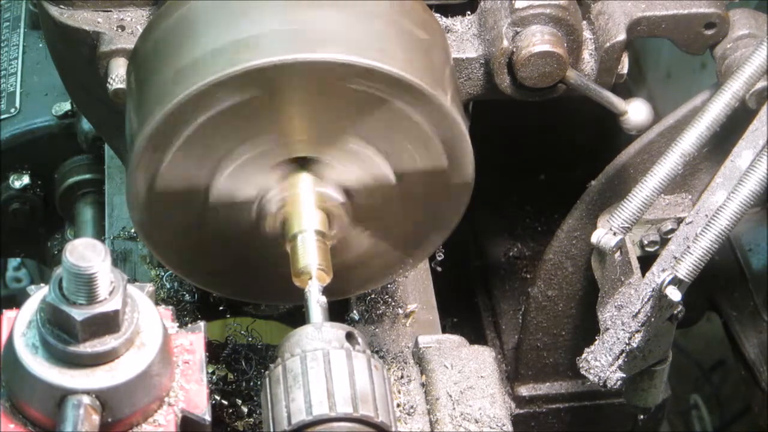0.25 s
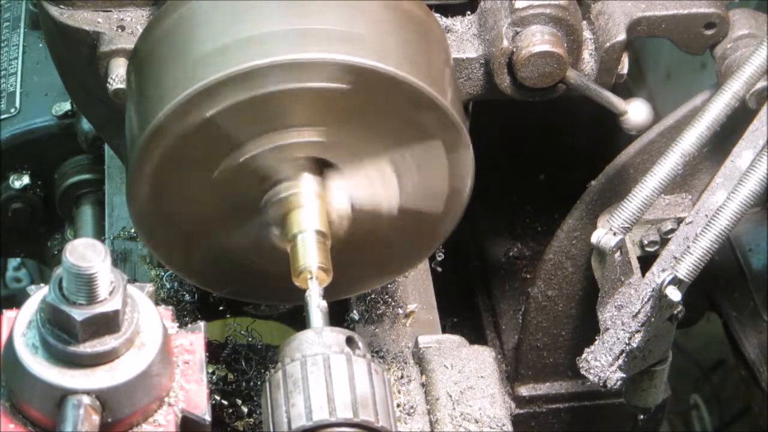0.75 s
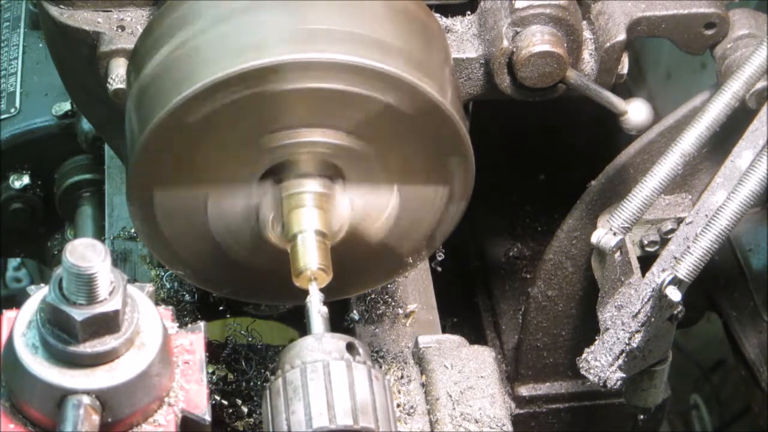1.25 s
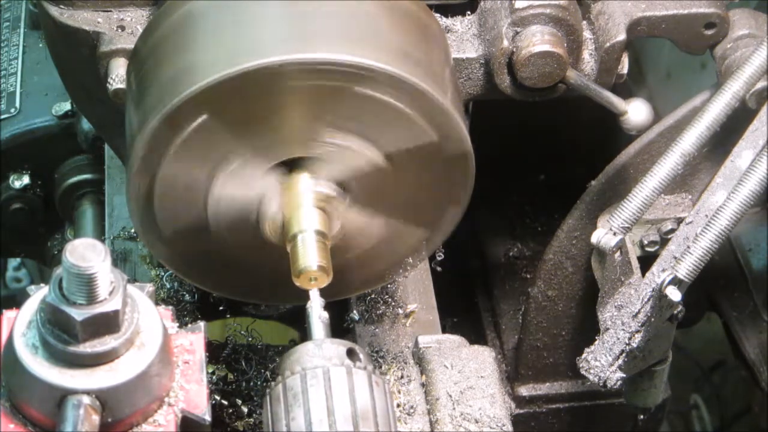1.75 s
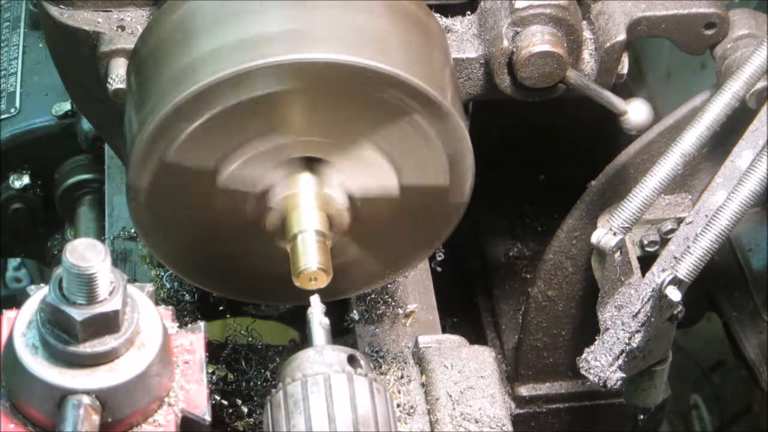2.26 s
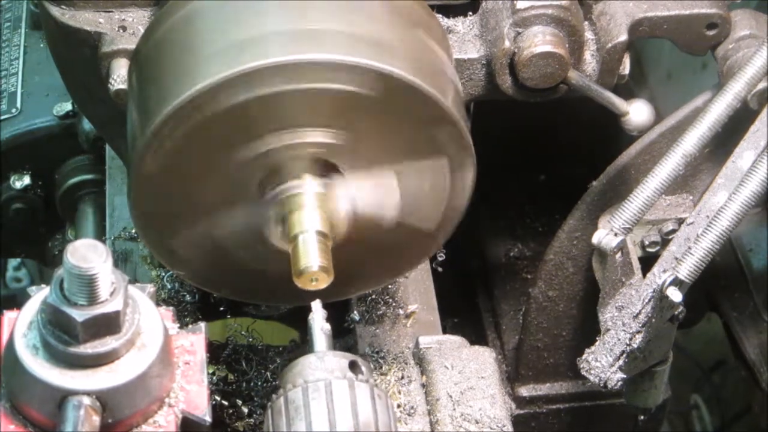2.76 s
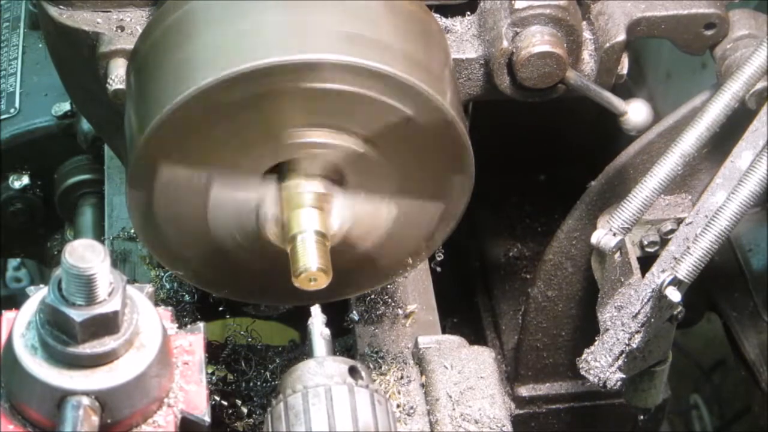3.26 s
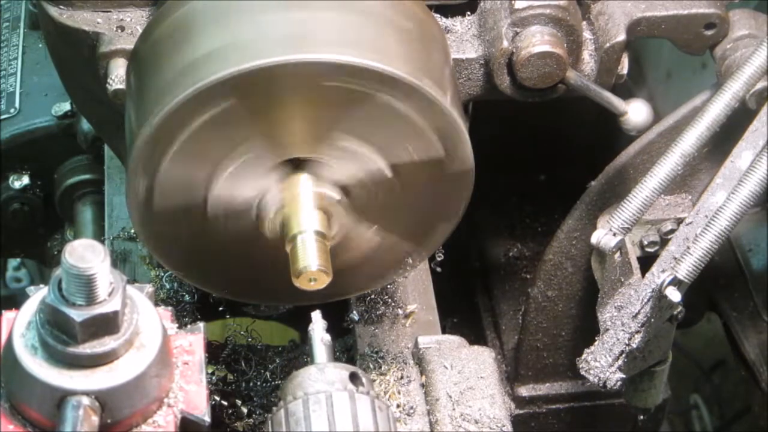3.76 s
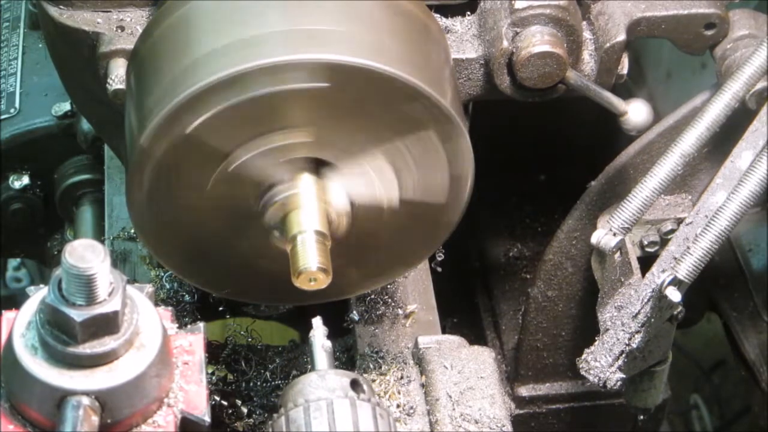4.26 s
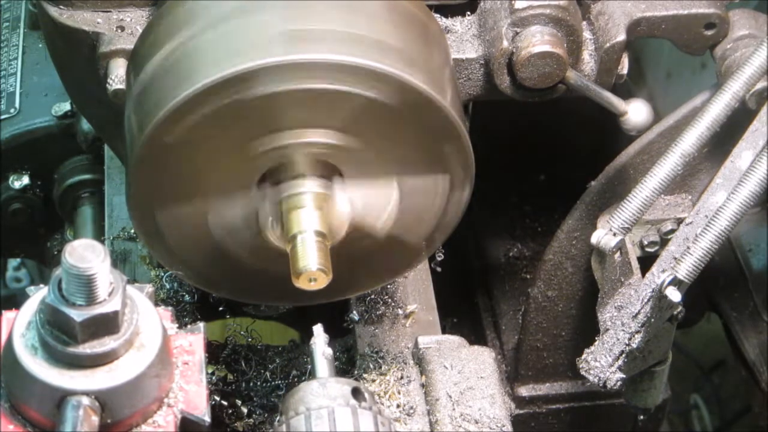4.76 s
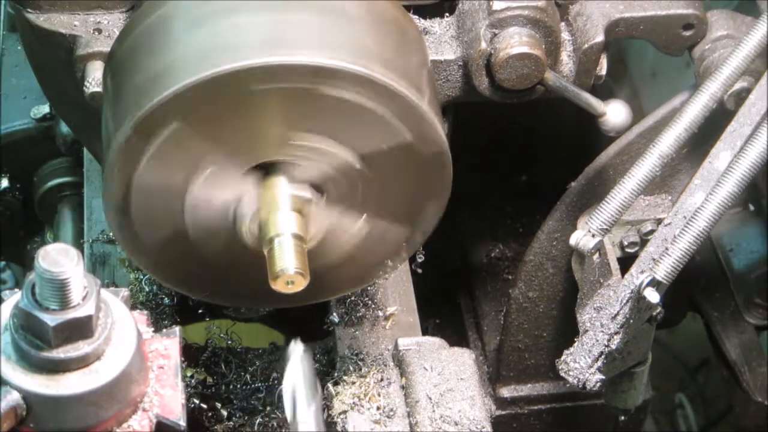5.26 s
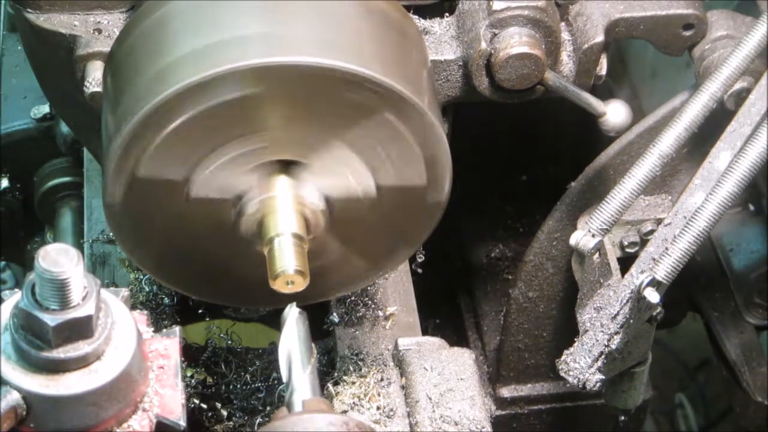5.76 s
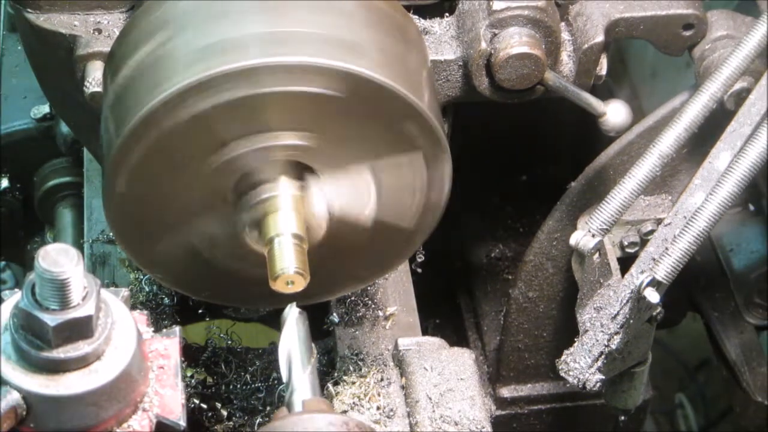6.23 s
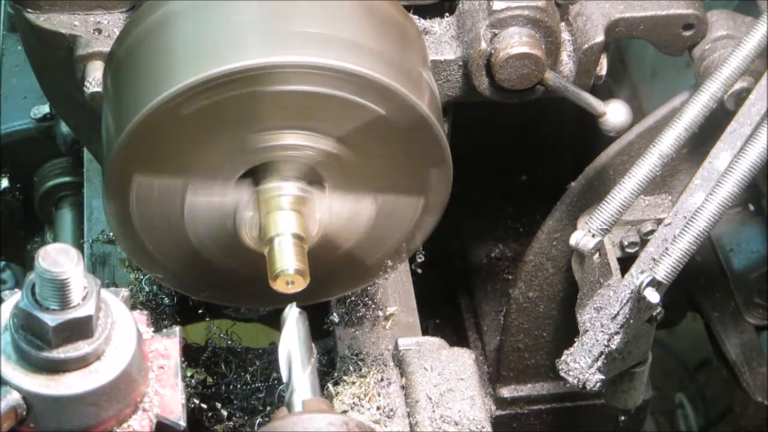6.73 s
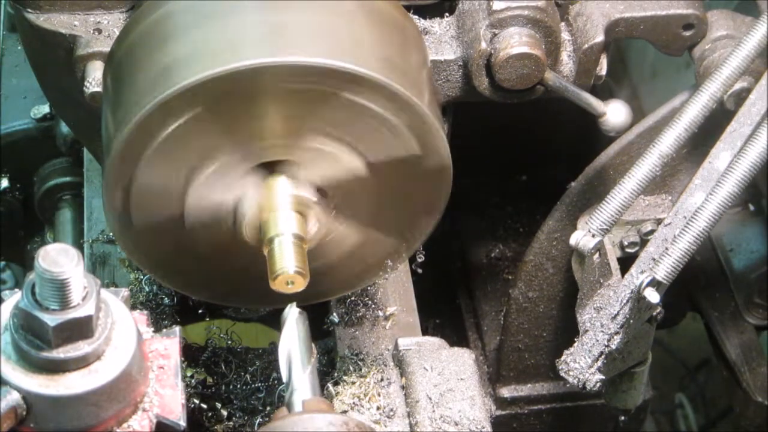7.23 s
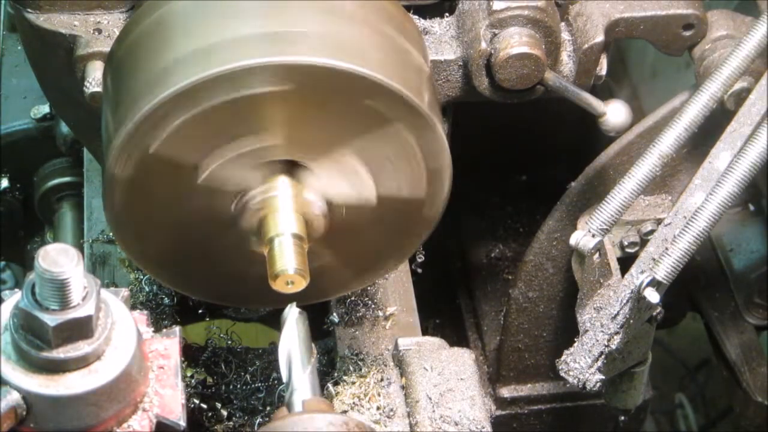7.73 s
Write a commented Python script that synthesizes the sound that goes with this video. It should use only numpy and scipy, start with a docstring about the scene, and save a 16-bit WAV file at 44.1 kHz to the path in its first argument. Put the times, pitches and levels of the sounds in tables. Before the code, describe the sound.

Close in a workshop, a belt-driven lathe runs steadily: low rumble and hum, gritty gear whir, a thin squeaky chirr and airy bearing hiss. Light metallic ticks fall about twice a second. The machine eases slightly as a small drill leaves brass, with dull soft thumps. All fades to silence near five seconds, then the same whir fades in, without ticks, and a low groan starts at the very end.

```python
"""Drilling brass on a belt-driven lathe

Modulated noise rings filters shaped like the castings, bearings and a loose pulley; drifting sines hum and whine.
A small drill leaves the brass, the belt joint ticks once a lap and the tailstock thumps the bed as decaying modes.
The sound fades to silence, then fades in on a second set-up without ticks, where a larger drill begins to rub."""
import sys
import numpy as np
from scipy import signal
from scipy.fft import rfft, irfft, next_fast_len
from scipy.io import wavfile
from scipy.ndimage import map_coordinates

SR = 44100
rng = np.random.default_rng(int(sys.argv[2]) if len(sys.argv) > 2 else 0)


def put_to_file(sound):
    """Save the sound as 16-bit audio at rate SR, in the file named by the first command-line argument."""
    columns = np.atleast_2d(sound).T  # one column per channel
    safe = np.clip(columns, -1, 1)
    whole_steps = np.round(safe * 32767)
    wavfile.write(sys.argv[1], SR, whole_steps.astype(np.int16))


N = 352359

# All layer levels below are those ahead of the fader in record().
CHANGE_S = 5.16  # the second set-up starts here, in silence
SPINDLE_HZ, SHAFT_HZ = 6.65, 13.71  # turns per second
VEE_BELT_HZ, FLAT_BELT_HZ = 5.14, 2.195  # laps per second
TOP_HZ = 15780  # band limit

# reference levels (first set-up dB, second set-up dB), which each source trims
RUMBLE_DB, GEAR_DB, HISS_DB = (-35.5, -36), (-35, -36.5), (-38.4, -38.5)
# the machine eases off once, as the small drill leaves the cut
EASE_START_S, EASE_FALL_S, EASE_HOLD_S, EASE_RECOVER_S = 1.81, 0.86, 0.54, 0.66
EASE_RUMBLE_DB, EASE_GEAR_DB, EASE_HISS_DB = 2.5, 2, 2
# slow swell of gears and pulley (peak dB), and scale of the chance drift of the rumble
SWELL_HZ, SWELL_CREST_S, SWELL_DB, DRIFT_DB = 2.11, 0.072, 0.54, 0.6
# straight fades: silent from, silent until, then gain per second
FADE_OUT_END_S, FADE_IN_START_S, FADE_IN_PER_S = 5.135, 5.203, 0.196
# first edge of the belt lacing to the second, then on to the rebound
EDGE_GAP_S, REBOUND_S = 0.0035, 0.0046
# the large drill meets the brass: time of full contact, level there, and rise on the way
BITE_S, BITE_DB, BITE_RISE_DB_PER_S = 7.87, -36.5, 135


def amp(db):
    """Level to amplitude: 20 dB is a factor of ten in pressure."""
    return 10 ** (np.asarray(db) / 20)


def unit(x):
    """Normalise by mean power, so that the rms is 1."""
    return x / np.sqrt(np.mean(x ** 2) + 1e-20)


def clock():
    """Sampling: the time of each sample, in s."""
    return np.arange(N) / SR


def set_up(first, second):
    """Piecewise control: one value for the first set-up, another for the second."""
    return np.where(clock() < CHANGE_S, first, second)


def wobble(rate):
    """Band-limited fluctuation: a smooth curve through random knots, rate of them per second."""
    knots = rng.standard_normal(int(N * rate / SR) + 4)
    return map_coordinates(knots, [clock() * rate])


def turning(hz, crest_s=0):
    """Periodic modulation: a cosine swing of hz cycles per second with a crest at crest_s."""
    return np.cos(2 * np.pi * hz * (clock() - crest_s))


def body(spectrum, resonances=(), size=8192):
    """Minimum phase: the causal impulse response of a broad spectrum with resonances or dips."""
    hz = np.fft.rfftfreq(size, 1 / SR)
    f, level = np.transpose(spectrum)
    db = np.interp(np.log(hz + 1), np.log(f), level)
    for centre, width, height in resonances:
        db = db + height / (1 + (2 * (hz - centre) / width) ** 2)
    # folding the cepstrum onto positive times makes the response causal
    cepstrum = irfft(np.log(amp(db)))
    cepstrum[1:size // 2] *= 2
    cepstrum[size // 2 + 1:] = 0
    return irfft(np.exp(rfft(cepstrum)))


def rub(response, force_db):
    """Random excitation: noise of changing force stands for countless contacts ringing a body; rms 1."""
    force = rng.standard_normal(N) * amp(force_db)
    return unit(signal.fftconvolve(force, response)[:N])


def add(track, s, sound):
    """Superposition: mix a sound into the track at time s."""
    start = round(s * SR)
    track[start:start + len(sound)] += sound[:N - start]


def tone(hz, stray_hz, stray_rate, flutter_db):
    """Frequency and amplitude modulation: a sine of rms 1 that strays in pitch and level."""
    pitch_hz = hz + stray_hz * wobble(stray_rate)
    phase = 2 * np.pi * (np.cumsum(pitch_hz) / SR + rng.random())
    return unit(np.sin(phase) * amp(flutter_db * wobble(6.7)))


def motor():
    """Tonal radiation: the motor and drive hum on narrow lines, with a thin whine on top."""
    # motor and drive tones: f/Hz, first set-up level/dB, second set-up level/dB
    hum_lines = [(73.3, -49, -52.5), (120, -46.5, -42), (183, -52, -57), (221, -49, -49),
                 (244, -49.5, -48.5), (295, -51, -53), (498, -55, -53.5), (571, -53, -53), (610, -60, -50),
                 (658, -60, -50.5)]
    # thin whine: f/Hz, level/dB
    whine_lines = [(10121, -74), (10343, -63), (10392, -67), (10494, -61), (10939, -77)]
    hum = sum(amp(set_up(db1, db2)) * tone(hz, stray_hz=0.01 * hz, stray_rate=14, flutter_db=1.5)
              for hz, db1, db2 in hum_lines)
    whine = sum(amp(db) * tone(hz, stray_hz=4, stray_rate=56, flutter_db=2.0)
                for hz, db in whine_lines)
    return hum + whine


def headstock(rumble_db, gear_db):
    """Forced vibration: gear teeth rattle the castings in step with the shaft and the motor belt's laps."""
    # spectra of the low rumble and of the gear noise: f/Hz, relative density level/dB per Hz
    rumble_spectrum = [(12, -24), (30, -17.5), (60, -8.5), (95, -6), (150, -3), (240, -1.5), (320, 1),
                       (400, -7.5), (530, -5.5), (600, -2), (700, -7.5), (800, -19), (1100, -51.5),
                       (2000, -100)]
    gear_spectrum = [(300, -76), (800, -10), (930, -1.5), (1250, -1.5), (1600, -2), (2000, -1.5),
                     (2450, -4.5), (3200, -3.5), (3700, -11.5), (6000, -63.5)]
    # casting resonances and dips in each set-up: f/Hz, width/Hz, height/dB
    first_castings = [(1003, 22, 8), (1083, 12, -14.5), (1223, 120, 4.5), (1474, 79, 5), (1752, 68, 8),
                      (1841, 94, 8), (2254, 26, 8.5), (2790, 13, 10), (2984, 70, 6)]
    second_castings = [(1040, 80, 1.5), (1090, 24, -18), (1264, 60, 4), (1477, 110, 5), (1780, 50, 3),
                       (1950, 67, 5), (3150, 200, -8)]
    belt_db = 1.1 * turning(VEE_BELT_HZ, crest_s=set_up(0.182, 5.541))
    teeth_db = 0.6 * turning(3 * SHAFT_HZ, crest_s=0.018) + 0.6 * turning(6 * SHAFT_HZ)
    force_db = belt_db + teeth_db + 1.3 * wobble(170) + 0.5 * wobble(30)
    first_gears = amp(1.02) * rub(body(gear_spectrum, first_castings), force_db)
    second_gears = amp(0.85) * rub(body(gear_spectrum, second_castings), 0.66 * force_db)
    gears = set_up(first_gears, second_gears)
    rumble = rub(body(rumble_spectrum), 0.66 * wobble(40))
    return amp(gear_db) * gears + amp(rumble_db - 0.96) * rumble


def pulley(gear_db, chirr_db=-12, rasp_db=-9):
    """Amplitude modulation: a loose pulley chirrs in step with its shaft, a wavering squeak over a rasp."""
    # pulley resonances: f/Hz, width/Hz, height/dB
    pulley_resonances = [(3019, 130, 20), (3097, 50, 13)]
    rattle_db = 2.2 * turning(3 * SHAFT_HZ, crest_s=0.018) + 2.4 * turning(6 * SHAFT_HZ)
    knock_db = 2.5 * (turning(SHAFT_HZ, crest_s=5.502) + turning(2 * SHAFT_HZ, crest_s=5.502))
    swing_db = set_up(rattle_db + 0.5 * knock_db, 0.5 * rattle_db + knock_db)
    force_db = swing_db + 0.81 * wobble(25)
    wavering = tone(set_up(3010, 3065), stray_hz=59.8, stray_rate=190, flutter_db=1.0)
    squeak = unit(amp(force_db) * wavering)
    rasp = rub(body([(1200, -49), (3000, 2), (7000, -55.5)], pulley_resonances), force_db)
    # louder as the gears work harder; the squeak is trimmed for each set-up
    squeak_db = chirr_db + set_up(-2.3, 4.1)
    return amp(gear_db) * (amp(squeak_db) * squeak + amp(rasp_db) * rasp)


def spindle(hiss_db):
    """Rolling noise: bearings hiss, swelling each turn and, at first, as the belt joint passes either pulley."""
    # hiss spectrum: f/Hz, relative density level/dB per Hz
    hiss_spectrum = [(1500, -44.5), (3000, -13), (3800, -1), (4400, 1), (5500, 2.5), (6400, 1.5),
                     (7100, -5), (8000, -11.5), (8700, -14.5), (9800, -19), (11400, -22), (12600, -29.5),
                     (15700, -35.5)]
    # bearing resonances and dips: f/Hz, width/Hz, height/dB
    bearing_resonances = [(4090, 70, 3), (5485, 110, 2), (5880, 100, -4), (6050, 90, 4), (7000, 50, 6),
                          (7590, 50, 6), (7740, 50, 4), (10400, 350, 6)]
    turn = turning(SPINDLE_HZ, crest_s=set_up(0.131, 5.562))
    pull = turning(2 * FLAT_BELT_HZ, crest_s=0.11)  # two pulleys in each lap
    lap = turning(FLAT_BELT_HZ, crest_s=0.27)
    swing_db = set_up(1.2 * turn + 0.5 * pull + 0.45 * lap, 1.4 * turn)
    force_db = swing_db + 0.5 * wobble(22) + 1.4 * wobble(250)
    return amp(hiss_db - 0.46) * rub(body(hiss_spectrum, bearing_resonances), force_db)


def belt_joint(scrape_t60=0.026, room_t60=0.4, room_db=-24):
    """Impact excitation: steel lacing slaps the pulley with one edge, the other, then a weak rebound."""
    # joint on the pulley, once a lap: t/s, relative level/dB, second edge re first/dB, brightness/dB
    laps = [(0.2405, -22, 2.5, -2.5), (0.6979, -17.5, -4.5, -5.5), (1.152, -19.5, -3, -3.5),
            (1.6075, -19.5, -6.5, -3), (2.0624, -15.5, -6, 1), (2.5164, -15.5, 1, -3),
            (2.9725, -15.5, 2, -4), (3.4292, -16.5, -1, -1), (3.8845, -18.5, 6, 2), (4.3409, -16, -2, -0.5),
            (4.7973, -22, 1, -4)]
    # scrape spectrum: f/Hz, relative density level/dB per Hz
    click_spectrum = [(200, -16), (800, -26), (1500, -2.5), (2500, -8), (3400, 1.5), (3850, -5.5),
                      (4400, 4.5), (6400, 1), (7600, -10), (9000, -7), (10200, -19), (13200, -17),
                      (15700, -39)]
    # modes that the joint rings: f/Hz, mean relative level/dB, t60/s
    steel_modes = [(2290, -13, 0.12), (2794, -15.5, 0.15), (3055, 2, 0.025), (3410, -6.5, 0.019),
                   (4330, 0.5, 0.028), (4520, -5, 0.043), (4670, 1.5, 0.028), (4770, -7.5, 0.12),
                   (5526, 0, 0.053), (5620, -8, .03), (6298, 4, 0.042), (6430, -3.5, 0.046),
                   (6700, -13, .05), (7380, -8, 0.063), (8900, -13.5, 0.053), (9730, -20.5, .045),
                   (10440, -22.5, 0.045), (12400, -16.5, 0.046), (13350, -22, .035)]
    track, t = np.zeros(N), np.arange(SR // 4) / SR
    click = body(click_spectrum)
    scrape_db = -1.5  # relative to the ring
    attack = 1 - np.exp(-t / 0.0002)
    # one contact's scrape, with the faint short tail of the workshop
    force = amp(-60 * t / scrape_t60) + amp(room_db - 60 * t / room_t60)
    for s, db, second_db, bright_db in laps:
        # brightness tilts the sound toward the treble, as a harder blow does
        hardness = body([(3000, -bright_db), (6000, 0), (12000, bright_db)], size=512)
        contacts = [(0, 0), (EDGE_GAP_S, second_db), (EDGE_GAP_S + REBOUND_S, -14)]
        # the contacts share one energy
        total = np.sqrt(sum(amp(level) ** 2 for delay, level in contacts))
        for delay, level in contacts:
            ring = sum(amp(mode_db + rng.normal(0, 1.0) - 60 * t / t60)
                       * np.sin(2 * np.pi * (hz * t + rng.random()))
                       for hz, mode_db, t60 in steel_modes)
            scrape = signal.fftconvolve(force * rng.standard_normal(len(t)), click)[:len(t)]
            blow = attack * (unit(ring) + amp(scrape_db) * unit(scrape))
            slap = signal.fftconvolve(blow, hardness)[:len(t)]
            # every tick sits 13 dB under its relative level
            add(track, s + delay, amp(db + level - 13.0) / total * unit(slap))
    return track


def lull():
    """Load envelope: 0 to 1 and back as the machine eases off, stays quieter, then recovers."""
    corners = EASE_START_S + np.cumsum([0, EASE_FALL_S, EASE_HOLD_S, EASE_RECOVER_S])
    return np.interp(clock(), corners, [0, 1, 1, 0])


def tailstock():
    """Modal decay: dull knocks shake the low modes of the bed, their balance tilted by hardness."""
    # thumps: t/s, relative level/dB, hardness tilt/dB per octave about 86 Hz
    knocks = [(2.47, -32, 4), (2.649, -22, -5), (2.823, -36.5, -8)]
    # modes of the bed and stand: f/Hz, relative level/dB, t60/s
    bed_modes = [(38, -6.5, 0.31), (85, 0.5, 0.48), (111, -8, .25), (152.3, -2.5, 0.32), (207, -10.5, 0.35)]
    track, t = np.zeros(N), np.arange(SR // 2) / SR
    attack = 1 - np.exp(-t / 0.0028)
    for s, db, tilt_db in knocks:
        ring = sum(amp(level + tilt_db * np.log2(hz / 86) - 60 * t / t60) * np.sin(2 * np.pi * hz * t)
                   for hz, level, t60 in bed_modes)
        add(track, s, -amp(db) * ring * attack)
    return track


def drill():
    """Friction noise: the two lips of the large drill start to rub the brass, twice per turn."""
    # groan spectrum: f/Hz, relative density level/dB per Hz
    groan_spectrum = [(20, -25.5), (55, -8), (200, -12), (400, 3.5), (480, 1.5), (800, -15), (3000, -56.5)]
    contact_db = BITE_DB - BITE_RISE_DB_PER_S * np.maximum(BITE_S - clock(), 0)
    return amp(contact_db) * rub(body(groan_spectrum), 1.4 * turning(2 * SPINDLE_HZ))


def scene():
    """Superposition of all parts of the lathe; one lull lowers rumble, gears, pulley and hiss together."""
    ease = lull()
    rumble_db = set_up(*RUMBLE_DB) - EASE_RUMBLE_DB * ease + DRIFT_DB * wobble(3.92)
    gear_db = set_up(*GEAR_DB) - EASE_GEAR_DB * ease + SWELL_DB * turning(SWELL_HZ, SWELL_CREST_S)
    hiss_db = set_up(*HISS_DB) - EASE_HISS_DB * ease
    running = motor() + headstock(rumble_db, gear_db) + pulley(gear_db) + spindle(hiss_db)
    return (running + belt_joint() + tailstock() + drill())[None]


def record(dry):
    """Linear gain and band limiting: the fader closes and opens at even paces, and the top is cut off."""
    closing = 1 - clock() / FADE_OUT_END_S
    opening = FADE_IN_PER_S * (clock() - FADE_IN_START_S)
    faded = dry * np.maximum(set_up(closing, opening), 0)
    size = next_fast_len(N + SR // 2)
    passed = np.fft.rfftfreq(size, 1 / SR) < TOP_HZ
    return irfft(rfft(faded, size) * passed, size)[:, :N]


dry = scene()
out = record(dry)
put_to_file(out)
```